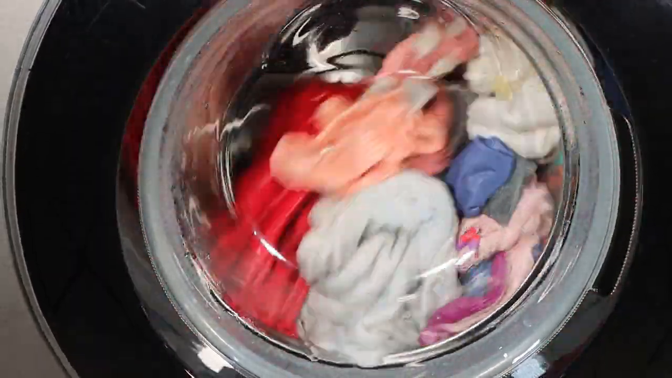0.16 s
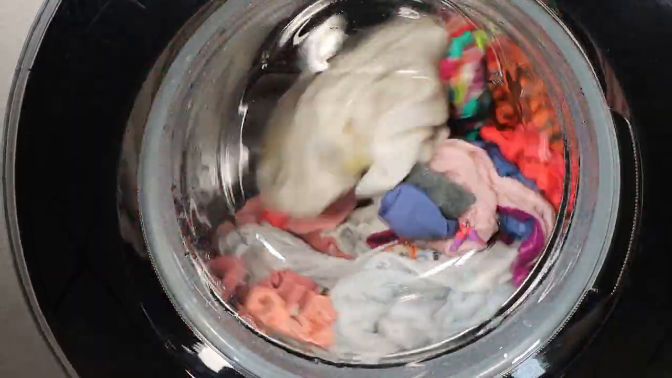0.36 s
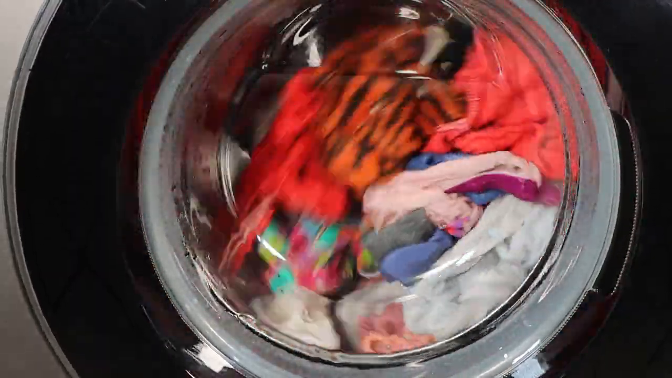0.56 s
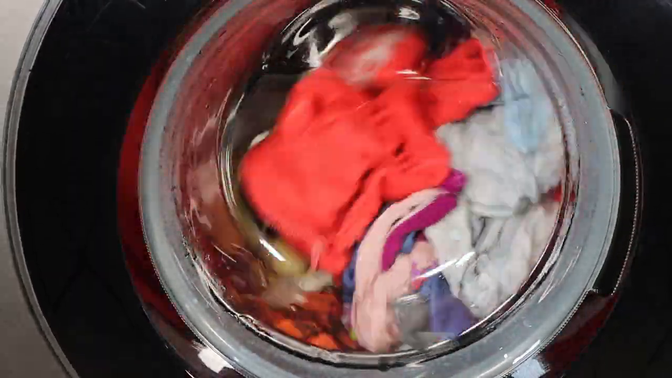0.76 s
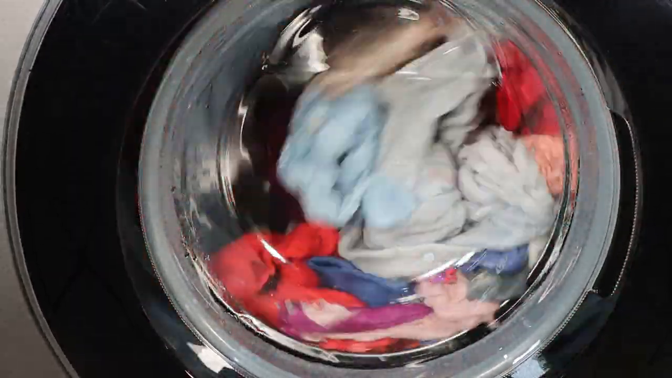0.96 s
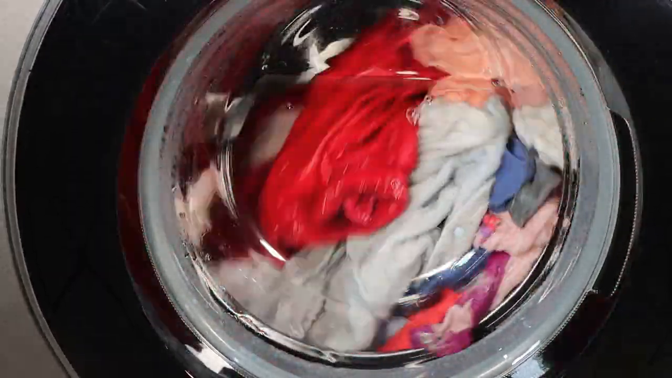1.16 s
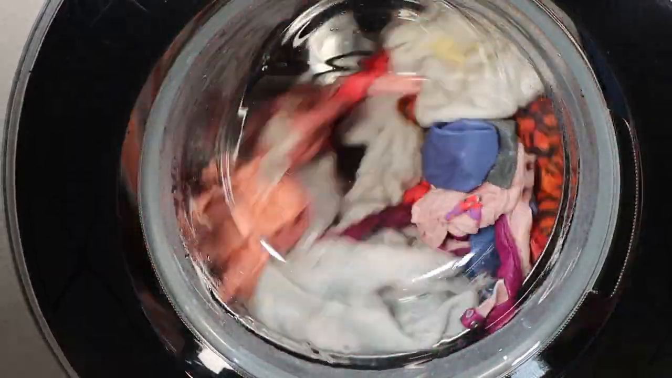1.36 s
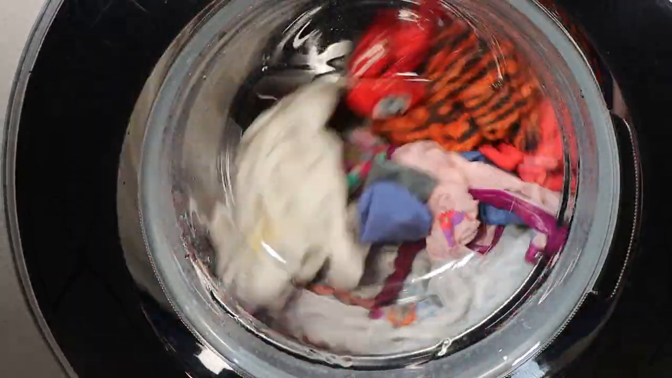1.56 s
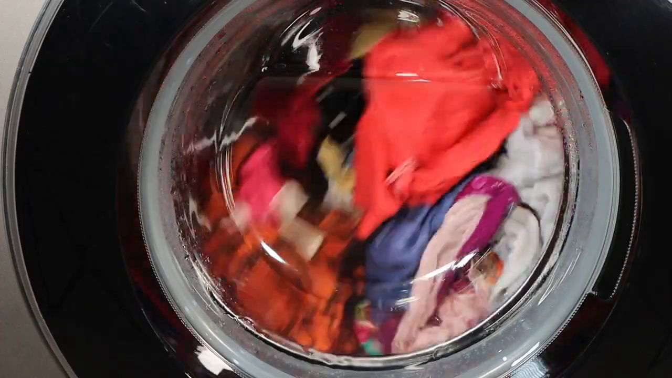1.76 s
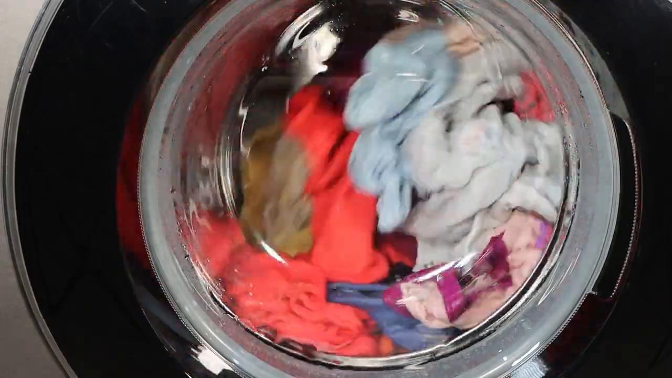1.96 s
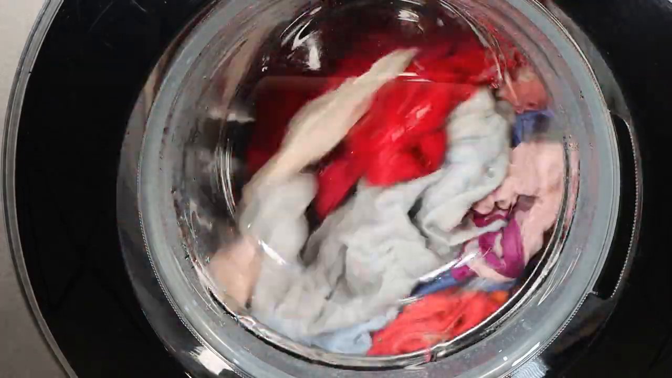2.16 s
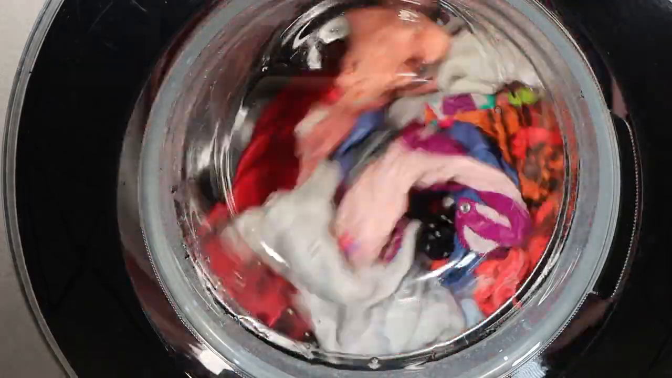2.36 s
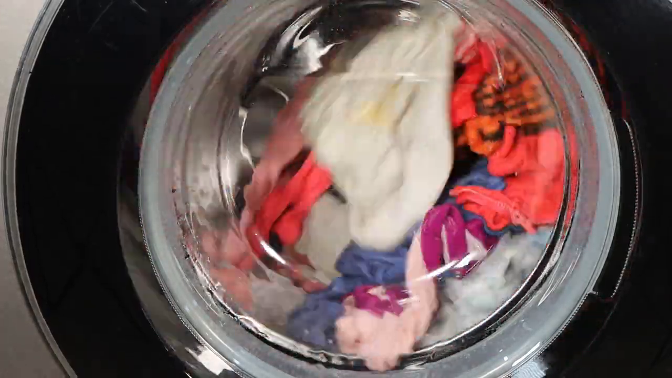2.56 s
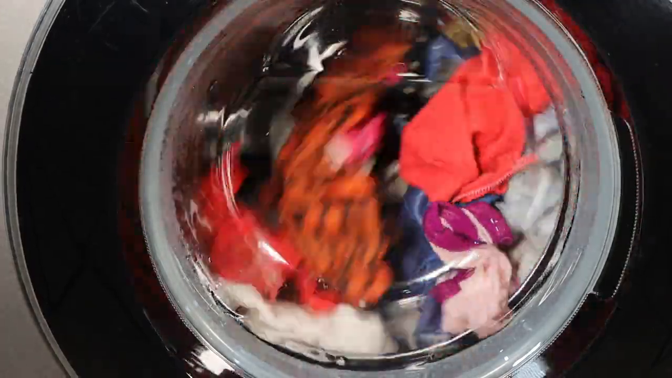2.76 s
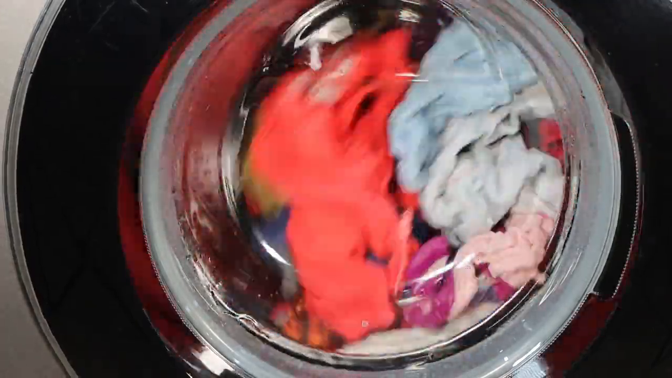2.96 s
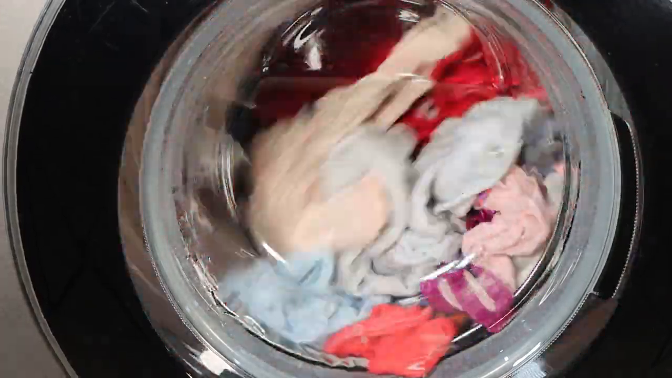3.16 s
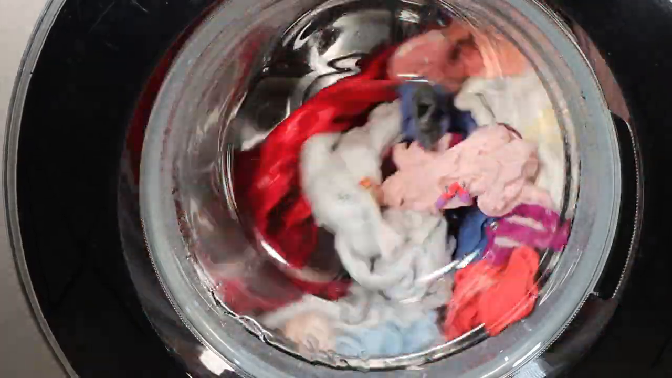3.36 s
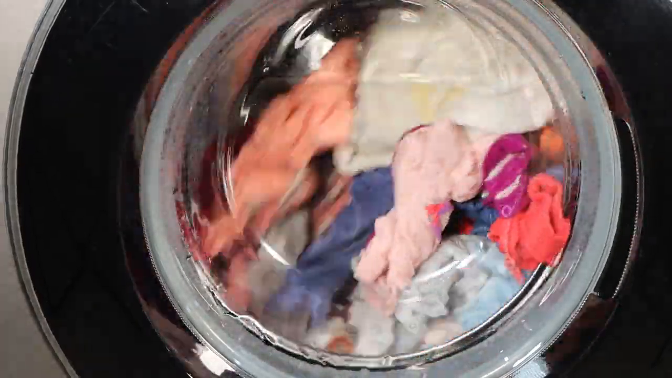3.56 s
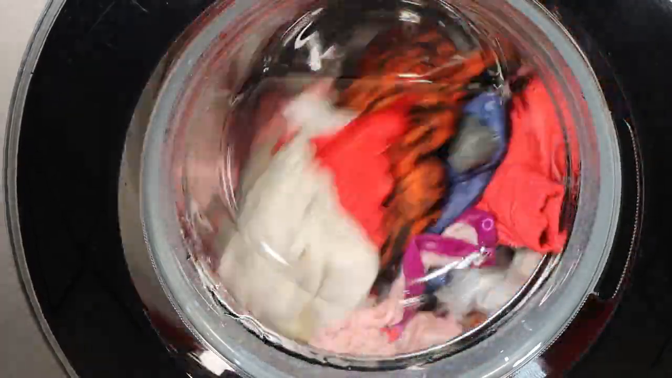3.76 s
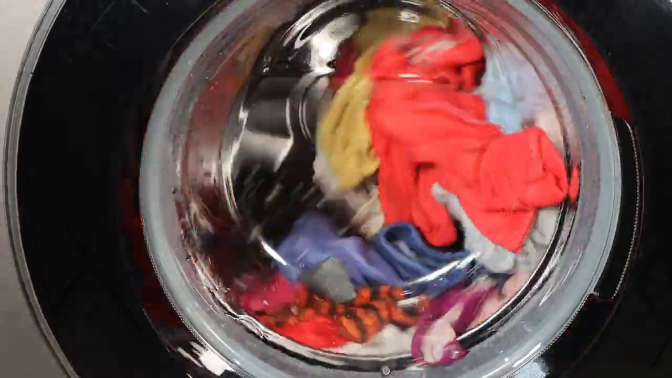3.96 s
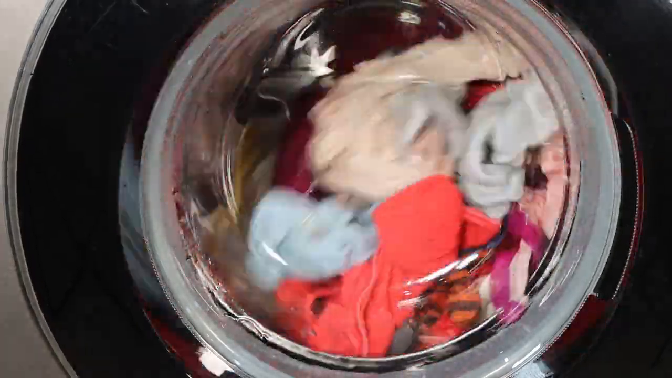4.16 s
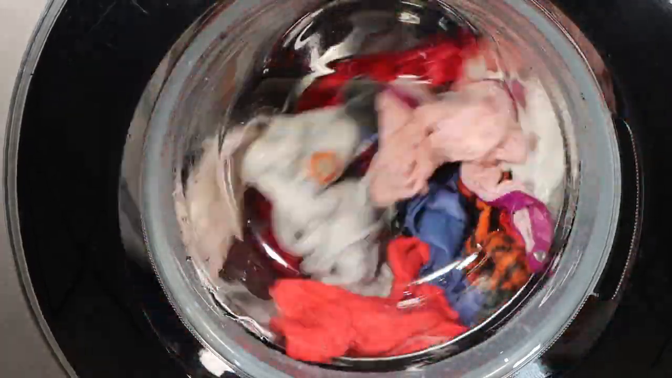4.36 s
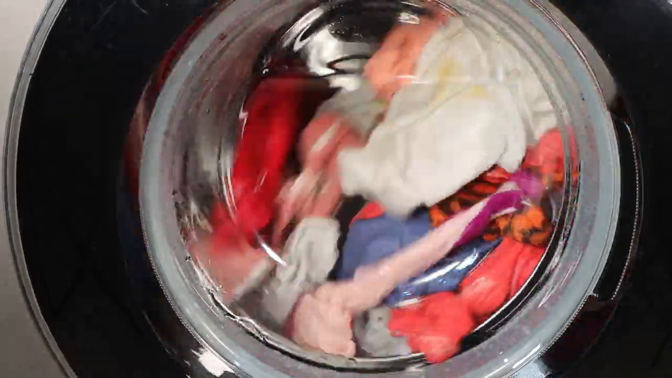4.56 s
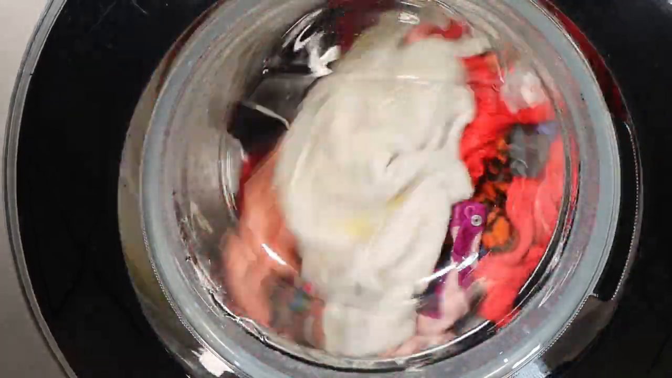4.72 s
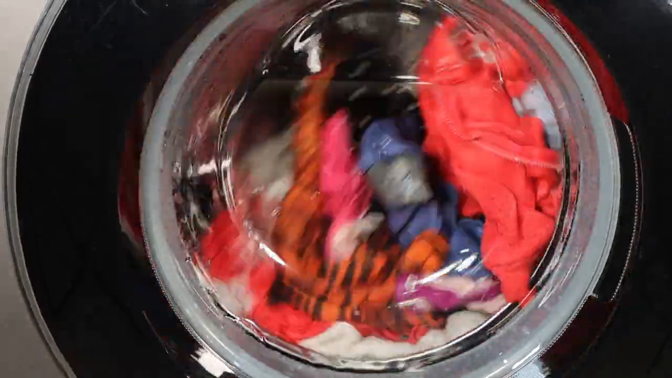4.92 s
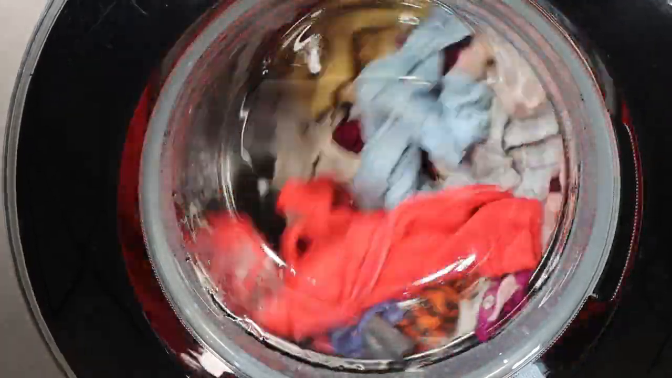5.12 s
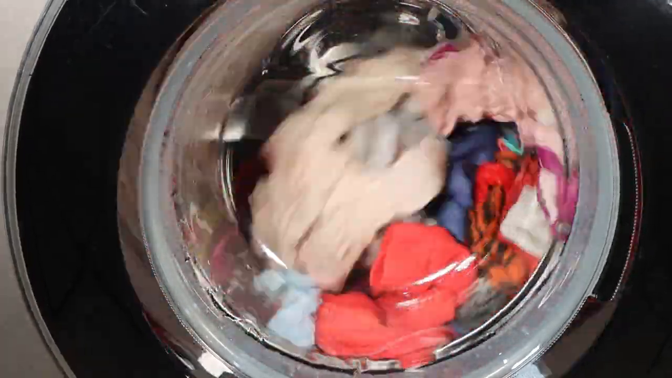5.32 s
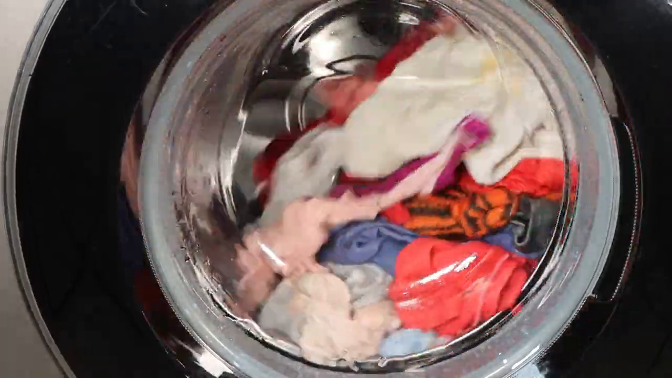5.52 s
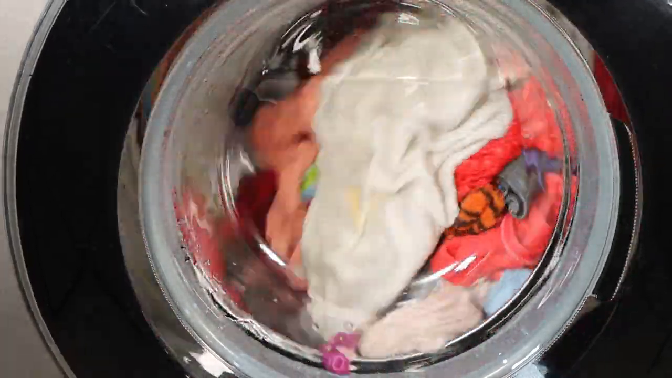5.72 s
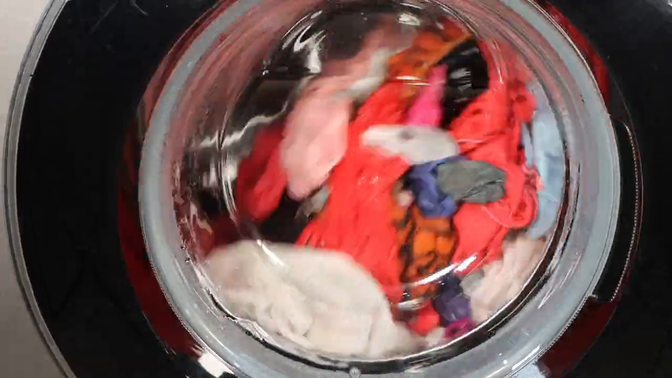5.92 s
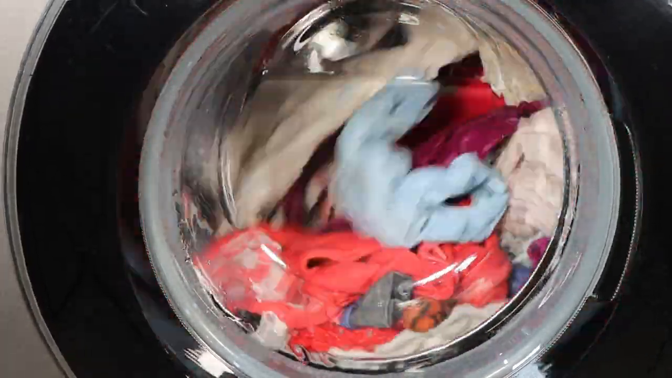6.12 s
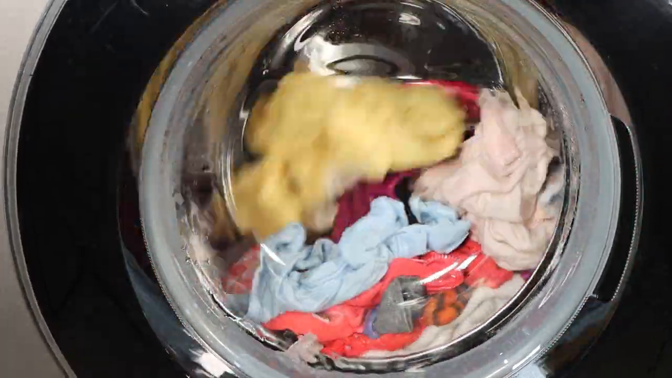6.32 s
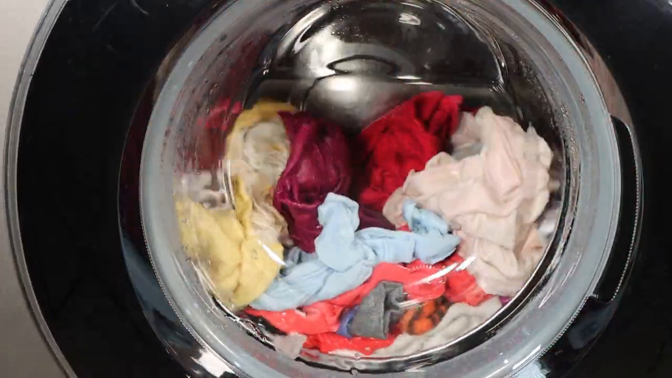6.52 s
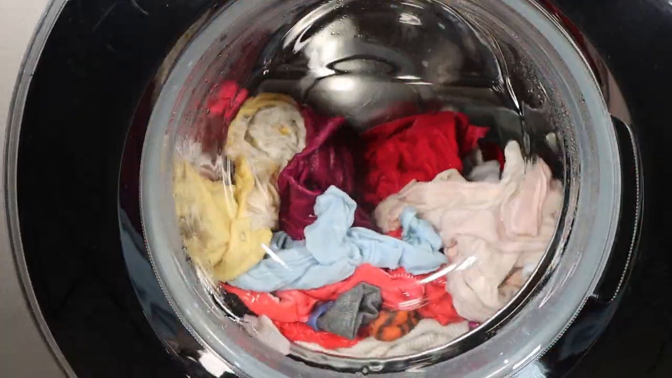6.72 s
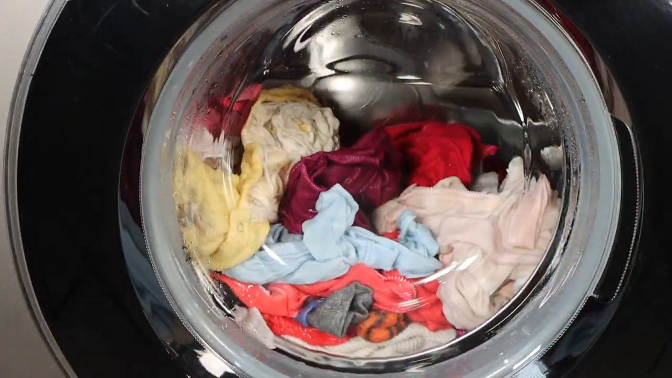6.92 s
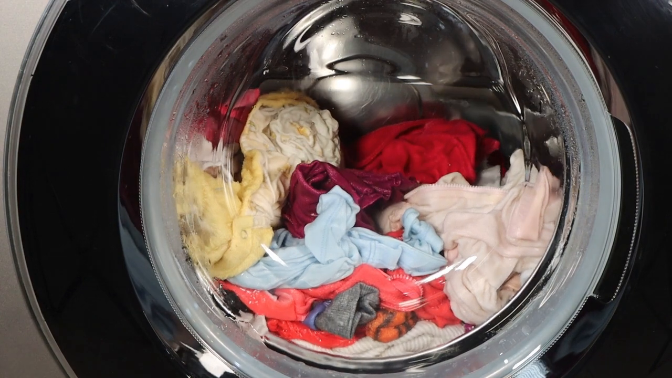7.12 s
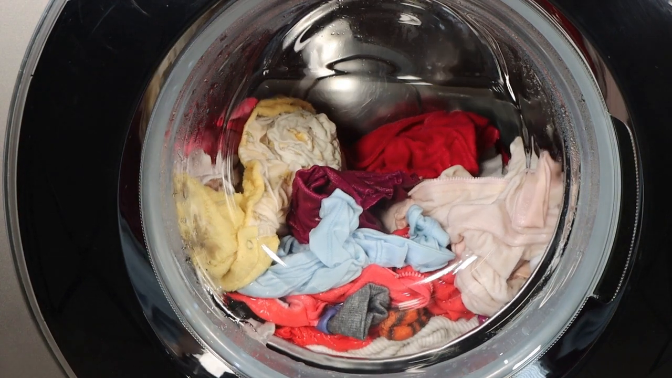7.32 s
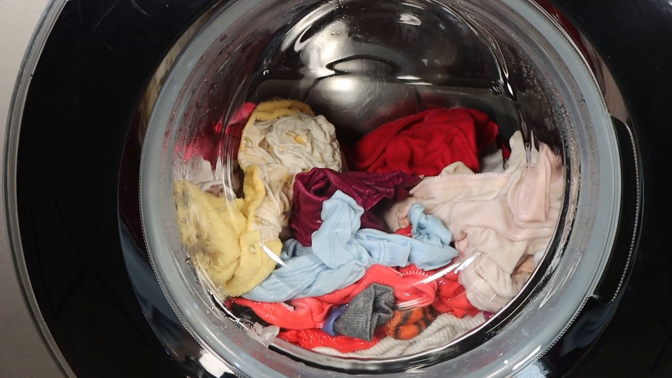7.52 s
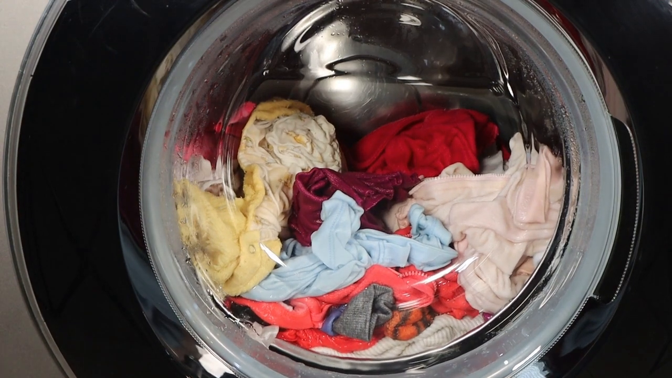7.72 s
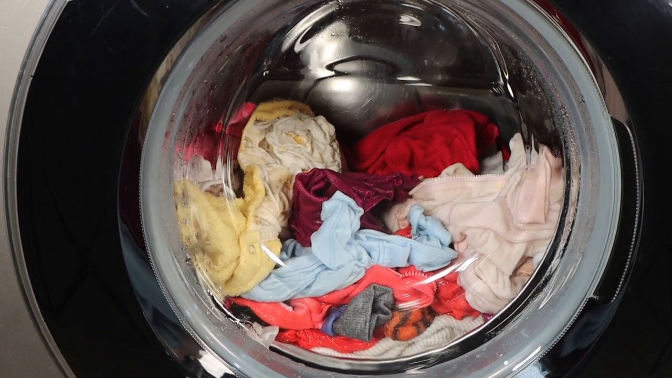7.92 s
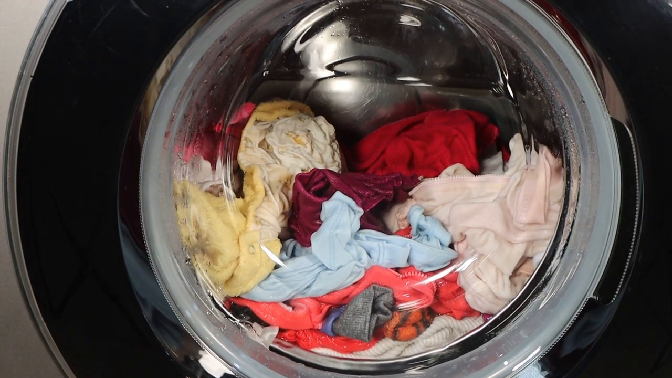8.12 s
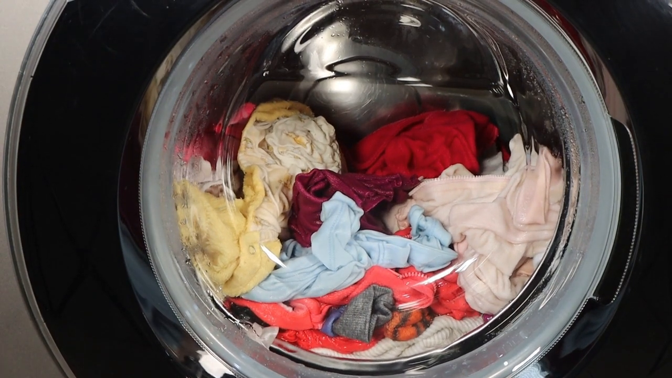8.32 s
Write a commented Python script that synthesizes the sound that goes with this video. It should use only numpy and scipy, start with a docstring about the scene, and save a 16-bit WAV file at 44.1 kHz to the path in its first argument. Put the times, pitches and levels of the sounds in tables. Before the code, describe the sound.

Wet clothes tumble in a washer, landing in uneven thumps over a low electric hum. Sharp taps and short scrapes of buttons on the glass door mix with brushing cloth and light water spray. Near the end the hum cuts out and the drum coasts to rest, knocking softly and ticking three times, leaving still indoor air. A phone microphone picks it up close to the door.

```python
"""Front-loading washer coming to a stop

A phone's two microphones, one step from the door, in a quiet room. The motor buzzes at twice the
mains rate while wet laundry falls and slaps inside the steel drum. Cloth brushes the glass door;
buttons and zips tap and scrape it. After about six seconds the drum coasts to rest, the tub rocks
on its springs, the machine ticks as it settles, and the still air of the room remains."""
import sys
import numpy as np
from scipy import signal
from scipy.fft import rfft, irfft
from scipy.io import wavfile
from scipy.ndimage import uniform_filter1d

SR = 44100
rng = np.random.default_rng(int(sys.argv[2]) if len(sys.argv) > 2 else 0)


def materialize(psi):
    """Save the field psi as 16-bit PCM at rate SR to the path in sys.argv[1].

    A 1-D psi becomes a single channel; in a 2-D psi each row is a channel.
    """
    bounded = np.clip(np.atleast_2d(psi).T, -1, 1)
    quanta = np.round(bounded * 32767).astype(np.int16)
    wavfile.write(sys.argv[1], SR, quanta)


N = 369558
TIME = np.arange(N) / SR
GRID = TIME[::64]  # time steps of slow controls


def undb(db):
    """Decibels to gain."""
    return 10 ** (np.asarray(db) / 20)


def unit(x):
    """Scale to rms 1."""
    return x / np.sqrt(np.mean(x ** 2))


def gain_of(db):
    """Slow level control to gain at every sample."""
    return np.interp(TIME, GRID, undb(db))


def power_sum(*db):
    """Joint level of unrelated sounds."""
    return 10 * np.log10(sum(10 ** (np.asarray(d) / 10) for d in db))


def colour(x, points):
    """Shape a sound by (frequency [Hz], level [dB]) points; rms 1."""
    hz, db = np.transpose(points)
    bins = np.arange(N // 2 + 1) * SR / N + 1
    return unit(irfft(rfft(x) * undb(np.interp(np.log(bins), np.log(hz), db)), N))


def ring(x, hz, width_hz):
    """One resonance, gain 1 at its centre."""
    return signal.lfilter(*signal.iirpeak(hz, hz / width_hz, SR), x)


def walk(rate):
    """Slow control: random levels held 1 / rate seconds and smoothed twice; rms 1."""
    n = len(GRID)
    hold = int(n * SR / N / rate)
    steps = np.repeat(rng.standard_normal(n // hold + 1), hold)
    return unit(uniform_filter1d(uniform_filter1d(steps, hold), hold)[:n])


def grains(rate, spread_db):
    """Dense clicks of uneven size; rms 1."""
    clicks = (rng.random(N) < rate / SR) * undb(spread_db * rng.exponential(1, N))
    return unit(clicks * rng.standard_normal(N))


def add(track, s, burst, db):
    """Place a burst at time s with the given peak."""
    i = int(s * SR)
    track[i:i + len(burst)] += (burst * undb(db) / np.abs(burst).max())[:N - i]


def swells(rows):
    """Level of overlapping events (time [s], level [dB], rise [s], t60 [s])."""
    s, db, rise_s, t60_s = np.transpose(list(rows))[:, :, None]
    age = np.maximum(GRID - s, 1e-9)
    return power_sum(*(db - 60 * age / t60_s + 20 * np.log10(-np.expm1(-age / rise_s))))


def turning(run_db, still_db, coast_s=6.21, fall_db_per_s=33):
    """Level of a sound that lasts while the drum turns and sinks as it coasts."""
    return power_sum(run_db - fall_db_per_s * np.maximum(GRID - coast_s, 0), still_db)


# Room tone at the phone: (frequency [Hz], relative level [dB])
ROOM_TONE = [(15, -41), (25, -8), (123, 2.5), (439, -6.5), (1020, -4.5), (1700, -12), (2110, -8.5),
             (2990, -18), (6560, -22.5), (12500, -45), (16000, -32)]


def room_tone(level_db=-60):
    """Still air all around, partly unlike at the two microphones."""
    mid, side = (colour(rng.standard_normal(N), ROOM_TONE) for _ in range(2))
    width = 0.88 * ring(side, 1500, 9000) * np.array([[1], [-1]])
    return gain_of(level_db + .8 * walk(3)) * (mid + width)


# Motor buzz from a step away: (harmonic [number], relative level [dB])
HARMONICS = [(1, -24.0), (2, 0.0), (3, -14.6), (4, -28.6), (6, -32.4), (7, -37.9), (9, -38.1), (11, -31.6),
             (12, -30.4), (15, -38.8), (17, -41.9), (19, -41.0), (20, -34.0), (21, -36.7), (22, -22.0),
             (23, -30.9), (24, -38.5), (25, -31.9), (26, -38.3), (27, -34.8), (28, -40.8), (29, -39.5),
             (30, -42.7), (31, -46.3), (35, -45.2), (36, -51.5), (37, -50.9), (38, -50.7), (39, -49.4),
             (40, -44.7)]
# Load swinging as the heap is lifted: (rate [swings per turn], depth [dB], crest time [s])
LOAD_SWINGS = [(1, .7, .723), (2, 2.0, .14), (4, .8, .075)]
# Slow rise and fall of the motor hum: (time [s], hum level [dB])
HUM_LEVEL = [(.1, -25), (.4, -25), (.64, -24), (.95, -25.5), (1.17, -25), (1.7, -25.5), (2.2, -24),
             (2.75, -26.5), (3.0, -24.5), (3.25, -25.5), (3.75, -24.5), (4.3, -27), (4.5, -24),
             (4.85, -25.5), (5.3, -23), (5.6, -27), (5.85, -26), (6.05, -23.5), (6.25, -27)]
# Brief dips in the hum, mostly as a heap lands: (time [s], depth [dB], half length [s])
HUM_DIPS = [(0.208, 6, .02), (.285, 4.5, 0.023), (.43, 2.5, .04), (0.738, 1.5, .04), (.93, 2.5, .04),
            (1.803, 1.5, .03), (1.995, 1.5, .03), (2.903, 3, .03), (4.09, 0, 0.036), (4.39, 3, 0.046),
            (4.63, 1, .04), (5.145, 5, .03), (5.453, 5, .03), (5.714, 2, 0.028), (5.95, 2.5, .03)]


def motor(buzz_hz=100.24, turn_s=1.046, stop_s=6.24, stop_width_s=0.042):
    """Magnetic pull twice a mains cycle; the cabinet hums with load, the whine follows it less."""
    load_db = sum(db * np.cos(2 * np.pi * k * (GRID - s) / turn_s) for k, db, s in LOAD_SWINGS)
    hum_db = load_db + np.interp(GRID, *np.transpose(HUM_LEVEL))
    hum_db -= sum(db * np.exp(-((GRID - s) / half_s) ** 2) for s, db, half_s in HUM_DIPS)
    running = 1 / (1 + np.exp((TIME - stop_s) / stop_width_s))
    buzz = 0
    for k, db in HARMONICS:
        swing_db = hum_db if k == 2 else -25.4 + .15 * load_db + 1.2 * walk(5)
        buzz += gain_of(db + swing_db) * np.sin(2 * np.pi * (k * buzz_hz * TIME + rng.random()))
    return np.sqrt(2) * buzz * running


# Rumble of the steel drum, heard from outside: (frequency [Hz], relative level [dB])
DRUM_SPECTRUM = [(190, -42), (320, -1.5), (352, -7), (1020, -7.5), (1190, -6), (1380, -13), (1690, -21),
                 (2070, -22.5), (2260, -12.5), (3200, -39), (4160, -52), (7040, -120)]
# Cabinet resonances: (frequency [Hz], width [Hz], relative level [dB])
CABINET_MODES = [(62, 25, -31), (98, 20, -18), (139, 40, 2), (201, 52, -2), (249, 53, -5)]
# Heaps landing behind the door:
# (time [s], thud peak [dB], pitch [Hz], rumble [dB], nominal t60 [s], slap [dB])
LANDINGS = [(0.094, -30.5, 456, -36, 0.43, -46), (0.137, -19, 470, -27, 0.54, -32),
            (0.202, -22, 476, -35, 0.77, -43), (0.31, -30, 476, -38, 0.45, -55),
            (0.652, -34, 804, -36.5, 0.58, -43), (0.793, -25, 370, -37.5, 0.36, -35),
            (0.827, -22, 1184, -41, .4, -49), (0.884, -24, 1215, -35, 0.54, -50),
            (1.035, -28.5, 482, -38, .6, -58), (1.183, -39, 506, -31.5, 1, -42.5),
            (1.335, -21, 1157, -34, 0.35, -55), (1.47, -29, 1150, -42, .5, -47),
            (1.511, -33.5, 930, -41.5, 0.63, -48), (1.723, -26, 350, -31, 0.52, -41),
            (1.877, -27, 1106, -37.5, .5, -40), (1.933, -20.5, 1200, -31.5, 0.62, -55),
            (2.084, -25, 353, -35, 0.88, -43), (2.15, -30, 490, -32.5, 0.58, -58),
            (2.32, -33, 1240, -42, 0.43, -42), (2.359, -24, 1166, -38, .4, -42),
            (2.392, -17.5, 1560, -31.5, 0.5, -28), (2.62, -29, 1156, -35, .6, -53),
            (2.795, -30, 595, -39, .4, -50), (2.84, -36, 789, -33, 0.84, -38),
            (2.93, -23.5, 1270, -35, 0.41, -46), (3.029, -29, 503, -41, .6, -54),
            (3.172, -29, 554, -27.5, 0.57, -38), (3.249, -26, 1210, -42, 0.37, -55),
            (3.317, -25.5, 357, -40, 0.71, -52), (3.423, -39, 433, -47, 0.36, -37.5),
            (3.484, -31, 846, -40, 0.64, -46), (3.67, -39, 498, -38, 0.44, -55),
            (3.705, -28, 353, -38.5, .4, -55), (3.753, -25, 456, -35.5, 0.38, -44),
            (3.938, -22, 1220, -30, 0.44, -43), (4.28, -32, 1270, -32, 0.69, -38),
            (4.351, -32, 528, -35, .6, -54), (4.39, -29, 471, -36.5, .6, -54),
            (4.455, -27, 730, -37, 0.63, -56), (4.562, -30, 1110, -37, 0.6, -58),
            (4.723, -27, 1146, -39, .4, -52), (4.773, -24, 783, -33, 0.41, -53),
            (4.832, -32, 470, -46, .4, -58), (4.928, -25, 394, -33, 0.48, -54),
            (4.981, -34, 544, -35.5, 0.7, -53), (5.045, -21, 1150, -29, 0.62, -46),
            (5.12, -32, 500, -34, 0.57, -39), (5.382, -32, 1250, -35, 0.59, -43),
            (5.43, -33, 595, -32.5, 0.38, -34.5), (5.59, -21, 827, -34, 0.61, -43),
            (5.708, -27.5, 400, -42, 0.69, -51), (5.871, -23, 410, -31, 0.29, -41),
            (5.996, -26, 353, -35.5, 0.58, -46), (6.059, -25, 498, -33, 0.6, -52),
            (6.222, -27, 1294, -34.5, 0.66, -47), (6.371, -36, 450, -52, 0.33, -65),
            (6.548, -31, 450, -44.5, 0.64, -50), (6.669, -32.5, 1755, -56, 0.53, -56)]


def tumbling(lead_s=.004):
    """Wet cloth drags in the drum and shakes the cabinet, swelling at each landing."""
    rumble = colour(grains(5000, 1.6), DRUM_SPECTRUM) * gain_of(2 * walk(35))
    slap = unit(ring(ring(grains(5000, 1.4), 1730, 1180), 1980, 1400))
    boom = unit(sum(undb(db) * ring(rng.standard_normal(N), hz, w) for hz, w, db in CABINET_MODES))
    boom *= gain_of(1.5 * walk(8))
    thump = unit(ring(ring(grains(3000, 1.5), 495, 330), 450, 590))
    s, _, _, rumble_db, t60_s, slap_db = np.transpose(LANDINGS)
    onsets = s - lead_s  # loose cloth lands before the heap

    def envelope(db, drag_db, rise_s, stretch):
        landings_db = swells(zip(onsets, db, np.full_like(s, rise_s), stretch * t60_s))
        return gain_of(power_sum(landings_db, drag_db))

    # the lows come late
    return (rumble * envelope(rumble_db, turning(-48, -70.5), rise_s=.005, stretch=.95)
            + boom * envelope(rumble_db - 1, turning(-44, -72), rise_s=.019, stretch=.95)
            + slap * envelope(slap_db, turning(-54, -69.5), rise_s=.006, stretch=.84)
            + thump * envelope(rumble_db - 3, turning(-51, -75.5), rise_s=.022, stretch=1.24))


def thuds(rise_s=0.00061, t60_s=0.046, splat_db=5.5):
    """Each landing heap splats and rings the drum shell; wet cloth blurs the pitch."""
    out, t = np.zeros(N), TIME[:SR // 8]
    fade = (1 - np.exp(-t / rise_s)) * np.exp(-t * np.log(1000) / t60_s)
    for s, db, hz, *_ in LANDINGS:
        push = rng.standard_normal(len(t))
        blur = 0.17 * np.cumsum(push) * np.sqrt(hz / SR)
        shell = np.sin(2 * np.pi * hz * t + blur)
        splat = undb(splat_db) * ring(ring(push, 1020, 1390), 1200, 2000)
        add(out, s, fade * (shell + splat), db)
    return out


# Cloth on the glass: (frequency [Hz], relative level [dB])
BRUSH_SPECTRUM = [(1410, -12), (2400, -1.5), (3000, -6.5), (3260, -8.5), (4050, -12.5), (4910, -26.5),
                  (8000, -22.5), (10400, -39), (17600, -120)]
# Water spray: (frequency [Hz], relative level [dB])
SPRAY_SPECTRUM = [(1760, -18), (3000, -32), (4080, -3.5), (5070, -7.5), (5520, -6), (7940, -2),
                  (10700, -4.5), (12200, -1), (13900, -6.5), (16000, -26)]
# Wet cloth passing the door: (loudest time [s], half length [s], brush [dB], spray [dB])
CLOTH_PASSES = [(.25, 0.25, -52, -64), (.95, .1, -48, -65), (1.903, .17, -54, -53), (2.5, .2, -49, -65),
                (3.253, .08, -48, -51), (3.353, 0.07, -45, -53), (3.97, 0.092, -50, -63),
                (4.76, 0.092, -60, -64), (5.15, 0.23, -55, -55), (5.577, 0.16, -51, -59),
                (6.104, 0.077, -58, -44.5), (6.52, 0.054, -55, -53.5), (7.502, 0.25, -69, -70),
                (7.84, 0.11, -64.5, -57.5)]


def swish(end_drop_db=6):
    """Wet cloth brushes the door and water sprays off it."""
    s, half_s, brush_peak_db, spray_peak_db = np.transpose(CLOTH_PASSES)[:, :, None]
    away_db = end_drop_db * ((GRID - s) / half_s) ** 2
    brush_db = power_sum(turning(-54, -75.5), *(brush_peak_db - away_db))
    spray_db = power_sum(turning(-60.5, -67), *(spray_peak_db - away_db))
    brush = colour(grains(9000, 1.4), BRUSH_SPECTRUM) * gain_of(brush_db + 2.3 * walk(30))
    spray = colour(grains(12000, 0.57), SPRAY_SPECTRUM) * gain_of(spray_db + 1.8 * walk(25))
    return brush + spray


def contact_db(hz, middle_hz, top_hz):
    """The place of contact favours one region of the door's middle modes and one of its top modes."""
    middle = np.exp(-(np.log(hz / middle_hz) / 0.15) ** 2)
    top = np.exp(-(np.log(hz / top_hz) / 0.064) ** 2)
    return 9 * (middle + top)


BAND_EDGES_HZ = 1800, 2700, 7500  # part the door modes into body, ping, middle and top
# Modes of the glass door: (frequency [Hz], nominal width [Hz], nominal level [dB])
DOOR_MODES = [(1225, 48, -13), (2360, 26, 0.5), (2980, 130, -10.5), (3330, 76, -5.5), (3980, 250, -6.5),
              (4570, 99, -12), (5010, 94, -18), (5470, 86, -6.5), (6000, 120, -10.5), (6940, 88, -13),
              (7300, 80, -24), (7990, 41, -13), (8500, 120, -17.5), (9330, 120, -23), (10250, 100, -27),
              (11300, 54, -17), (12100, 41, -18), (12730, 56, -22), (13500, 100, -20)]
# Buttons striking the door, a step from the phone: (time [s], peak [dB], body [dB], ping [dB],
# top and crack [dB], wet tail [dB], favoured middle [Hz], favoured top [Hz])
BUTTON_TAPS = [(0.162, -19, -1, 1.5, -18, -18, 2890, 8350), (0.7914, -30, 5, 10.5, -8, -20, 2890, 8240),
               (0.8215, -21, -11, 1, -12, -20, 2940, 8330), (0.85, -19, -17, -12, -29, -20, 3350, 7850),
               (1.182, -31, 15, -1, -16, -20, 3010, 8890), (1.2981, -25, 13, -11, -23, -20, 2910, 7850),
               (1.506, -30, 4, -2, -18, -20, 3010, 7710), (1.779, -21, -10, -3, -5.5, -22, 3330, 11200),
               (1.8257, -31, -23, -12, -17, -20, 3290, 8510), (1.839, -17.5, -24, -8, -14, -20, 3310, 8050),
               (1.8695, -19, -17, 2, -22, -20, 3300, 7870), (1.9325, -17, -21, -8, -19, -20, 3310, 8280),
               (2.319, -28.5, -9, -12, -13, -18, 2900, 8170), (2.358, -28, 12, 9, -16, -20, 2920, 8190),
               (2.395, -12, -4, -5, -24, -20, 2900, 7970), (2.9332, -20.5, 6, 4, -16, -20, 3400, 8910),
               (3.1283, -27, -1, 3.5, -7, -20, 3320, 11300), (3.173, -22, 15, 15, -20, -20, 3040, 7610),
               (3.2508, -3.5, -16, -13, -11.5, -10.5, 3550, 12200),
               (3.4193, -29.5, -8, 17, -17, -20, 2980, 7980),
               (3.8027, -24.5, -15, -13, -6.5, -18, 2850, 13100),
               (4.391, -24, 23, 12, -17, -20, 3110, 8310), (4.767, -29, 9, -4, -14, -20, 2910, 11200),
               (4.988, -26, -4, -4, -7, -20, 3350, 12100), (5.219, -20, -11, -24, -9.5, -7, 3400, 12400),
               (5.4296, -22.5, -9, -4, -19, -20, 2970, 7850), (5.6237, -21, -8, -2, -1.5, -13, 3360, 13400),
               (5.9443, -28, -5, 3, 0, -20, 2850, 12500), (5.993, -12.5, -24, -8, 0, -16, 6200, 11300),
               (6.0212, -18, -5, -1, -8, -20, 6140, 12600), (6.184, -15, -26, -23, -6, -20, 3320, 7850),
               (6.4443, -16, -24, 0, -4.5, -9.5, 3330, 8600), (6.4839, -24.5, -7, -4, -4, -13, 2850, 12500),
               (6.6672, -39, -7, -15, 0, 1, 4240, 7500)]


def taps(damping_t60_s=.042):
    """Each blow rings all door modes at once, with a short crack and a wet, hissing tail."""
    out, t = np.zeros(N), TIME[:SR // 6]
    hz, width, mode_db = np.transpose(DOOR_MODES)[:, :, None]
    band = np.searchsorted(BAND_EDGES_HZ, hz)
    fade = np.exp(-t * (np.log(1000) / damping_t60_s + width))  # wider modes die sooner
    for s, db, body_db, ping_db, edge_db, tail_db, middle_hz, top_hz in BUTTON_TAPS:
        detune, scatter, phase = rng.standard_normal((3, len(hz), 1))
        band_db = np.choose(band, [body_db, ping_db, 0.55 * mode_db - 13.5, edge_db - 12.5])
        gains = undb(band_db + contact_db(hz, middle_hz, top_hz) + 3.4 * scatter)
        modes = fade * np.sin(2 * np.pi * hz * (1 + 0.0096 * detune) * t + phase)
        hiss = ring(rng.standard_normal(len(t)), top_hz, 5500)
        crack = hiss * (undb(-3.5) * np.exp(-t / 0.0024) + undb(tail_db) * np.exp(-t / 0.043))
        add(out, s, (gains * modes).sum(0) + undb(edge_db) * crack, db)
    return out


# Hard trim dragged across the glass: (start [s], end [s], level [dB], ping [dB], top [dB],
# favoured middle from [Hz], to [Hz], favoured top [Hz])
TRIM_SCRAPES = [(0.84, 0.879, -29, -0.5, -15.5, 2980, 3400, 8400),
                (0.883, 0.908, -32, -4, -9.5, 4360, 4400, 7950),
                (1.854, 1.92, -31.5, 2, -11.5, 3350, 3370, 8600),
                (1.931, 1.984, -28.5, -3, -12, 4760, 5150, 8200),
                (2.02, 2.07, -47, -6, -16, 4940, 4900, 8500),
                (2.96, 3.043, -53.5, -7, -3.5, 2850, 3100, 8250),
                (3.054, 3.13, -58, 5, 0.5, 2750, 3100, 12300), (3.27, 3.36, -50, -4, -6, 4000, 4600, 8000),
                (4.11, 4.293, -62.5, 8.5, 2, 2780, 2850, 11500),
                (4.68, 4.79, -60.5, 0, -2, 2810, 2910, 11000), (4.932, 4.98, -53.5, 6, 5, 2900, 3100, 9900),
                (5.003, 5.023, -43, -6, 3, 3300, 3300, 11600),
                (5.06, 5.087, -49.5, -2, -1, 3000, 3100, 10800),
                (5.952, 5.977, -54, 6, 4.5, 2900, 3000, 11900),
                (6.03, 6.153, -48, 6, 0.5, 3000, 3900, 10900), (6.2, 6.27, -56, 5, 7, 3900, 3020, 11500),
                (6.46, 6.52, -57, 0, 8, 4000, 3000, 12000)]


def scrapes(grip_db_per_s=600, release_db_per_s=519):
    """Stick-slip grains move among the glass modes while trim drags over the door."""
    rows = np.transpose(TRIM_SCRAPES)
    starts, ends = rows[:2]
    nearest = np.searchsorted((ends[:-1] + starts[1:]) / 2, GRID)
    start, end, level_db, ping_db, top_db, from_hz, to_hz, top_hz = rows[:, nearest]
    level_db -= grip_db_per_s * np.maximum(start - GRID, 0)
    level_db -= release_db_per_s * np.maximum(GRID - end, 0)
    middle_hz = from_hz + (to_hz - from_hz) * np.clip((GRID - start) / (end - start), 0, 1)
    slip = grains(4500, 1.9)
    bands = [0, 0, 0.2 * unit(ring(slip, 4500, 3500)), 0.31 * colour(slip, SPRAY_SPECTRUM)]
    for hz, width, db in DOOR_MODES:
        mode = unit(ring(ring(slip, hz, 3.6 * width), hz, 8 * width))
        gain = gain_of(db + contact_db(hz, middle_hz, top_hz) + 3.2 * walk(25))
        bands[np.searchsorted(BAND_EDGES_HZ, hz)] += gain * mode
    body, ping, middle, top = map(unit, bands)
    mix = undb(-14.5) * body + gain_of(ping_db) * ping + middle + gain_of(top_db) * top
    return gain_of(level_db + 2.3 * walk(70)) * mix


# Knocks of the tub as the drum stops: (time [s], level [dB], rise [s], t60 [s])
TUB_KNOCKS = [(6.2, -34, 0.0046, 0.72), (6.548, -34, .008, .3), (6.63, -49, .01, 0.67),
              (7.14, -52, .01, .3), (7.2, -43, .015, .5), (7.265, -42, .01, .25), (7.58, -60, .02, .6),
              (7.69, -62, .01, .3)]


def rocking(sway_db=-60, fall_db_per_s=6):
    """The tub rocks on its springs: low knocks through the cabinet over a fading sway."""
    start_s = TUB_KNOCKS[0][0]
    sway = unit(ring(ring(rng.standard_normal(N), 77, 60), 76, 90))
    sway *= gain_of(sway_db - fall_db_per_s * (GRID - start_s) + 2.5 * walk(14))
    jolts = grains(900, 1.2)
    knocks = unit(ring(jolts, 148, 40) + ring(jolts, 179, 40) + 0.32 * ring(jolts, 230, 60))
    return knocks * gain_of(swells(TUB_KNOCKS)) + sway * (TIME > start_s)


# Ticks, faint at this distance: (time [s], peak [dB], pitch [Hz])
SETTLING_TICKS = [(7.4113, -43, 4170), (7.4893, -43, 4200), (7.5672, -42, 4200)]


def ticks(decay_s=.003):
    """The settling machine ticks: each short burst rings two high resonances."""
    out, t = np.zeros(N), TIME[:SR // 8]
    for s, db, hz in SETTLING_TICKS:
        burst = rng.standard_normal(len(t)) * np.exp(-t / decay_s)
        add(out, s, ring(burst, hz, 300) + 0.6 * ring(burst, 2900, 500), db)
    return out


def room(x, left_db, wet_db, t60_s=.18):
    """Direct sound leaning to one side, plus unlike echoes at each microphone, thin in the bass."""
    t = TIME[:int(t60_s * SR)]
    tails = rng.standard_normal((2, len(t))) * np.exp(-t * np.log(1000) / t60_s) * (t > .0015)
    tails = signal.lfilter(*signal.butter(1, (600, 14000), "band", fs=SR), tails)
    tails /= np.sqrt((tails ** 2).sum(1, keepdims=True))
    wet = signal.fftconvolve(x[None], tails, axes=1)[:, :N]
    return (x + undb(wet_db) * wet) * undb([[left_db / 2], [-left_db / 2]])


def scene():
    """The washer a step away, slightly right of centre, in a room with a short echo."""
    hum = room(motor(), left_db=-2.1, wet_db=-20)
    wet_cloth = room(swish(), left_db=-.4, wet_db=-20)
    drum = room(tumbling() + thuds() + ticks() + rocking(), left_db=-0.9, wet_db=-5)
    door = room(scrapes() + taps(), left_db=-0.56, wet_db=-8.5)
    return hum + wet_cloth + drum + door + room_tone()


# Phase between the phone's microphone ports: (frequency [Hz], lead of the left [rad])
PORT_PHASE = [(0, 0), (1290, .46), (1980, .47), (2240, -1.2), (2670, .86), (3270, -1.33), (4050, -1.),
              (4390, .4), (4820, -2.), (5600, 0), (6120, 1.1), (6370, -.2), (6900, 0), (16100, 0)]


def record(dry):
    """The phone's body shifts the phase between its ports; deep bass and the very top are cut."""
    bottom_hz, top_hz = 80, 16000
    hz, lead = np.transpose(PORT_PHASE)
    half_lead = np.interp(np.arange(N // 2 + 1) * SR / N, hz, lead) / 2
    ports = irfft(rfft(dry) * (1 + 1j * np.outer([1, -1], np.tan(half_lead))), N)
    ports = signal.lfilter(*signal.butter(1, bottom_hz, "high", fs=SR), ports)
    return signal.sosfilt(signal.ellip(10, .2, 90, top_hz, fs=SR, output="sos"), ports)


dry = scene()
out = record(dry)
materialize(out)
```